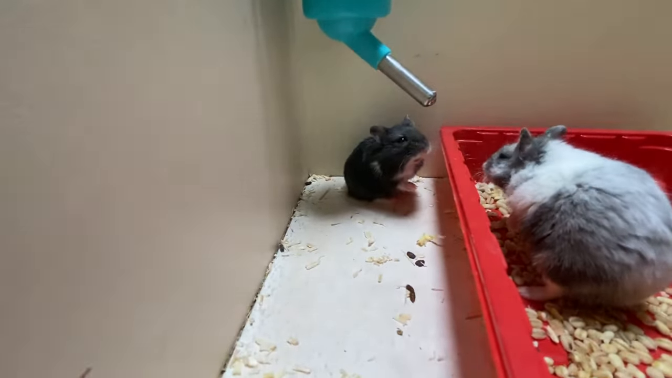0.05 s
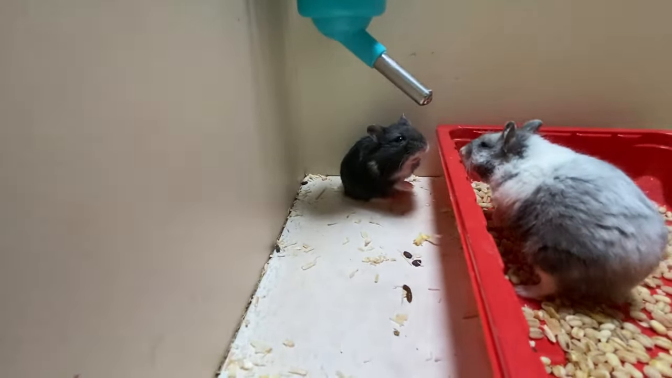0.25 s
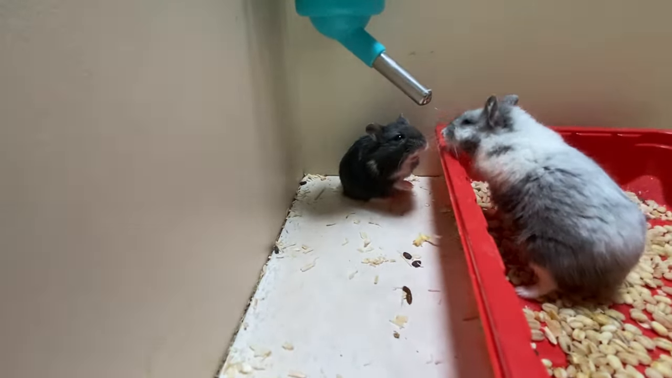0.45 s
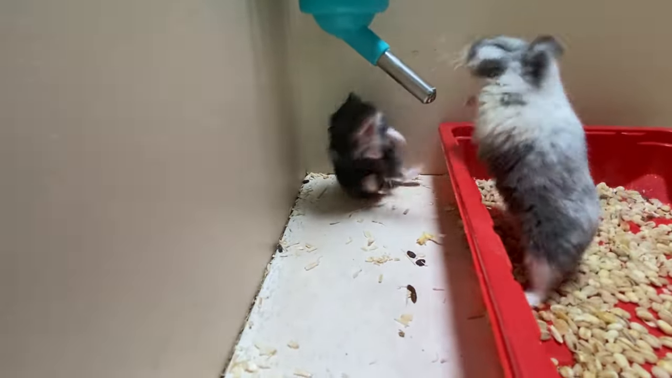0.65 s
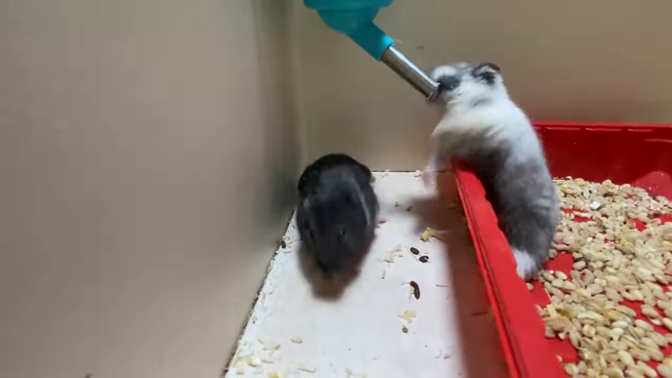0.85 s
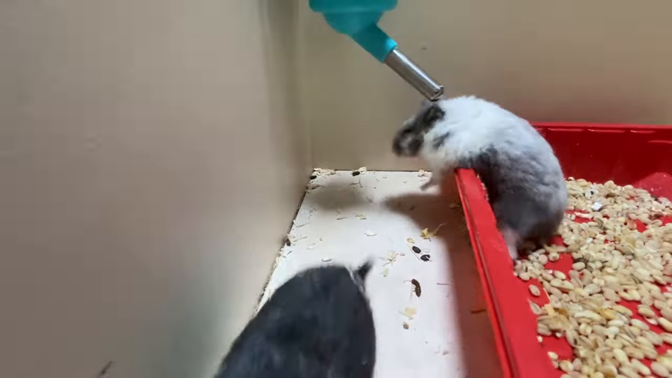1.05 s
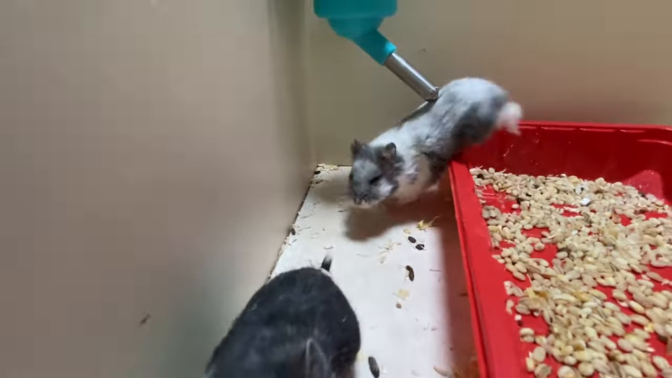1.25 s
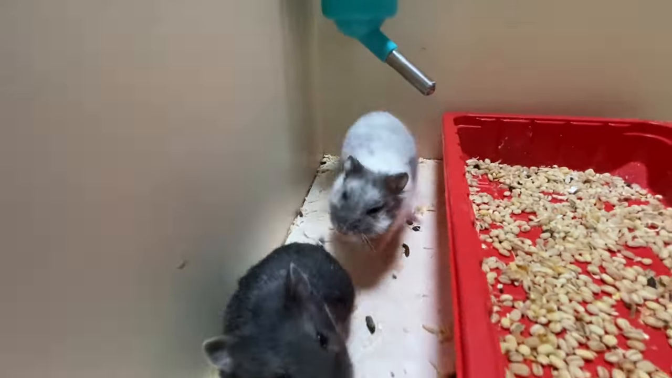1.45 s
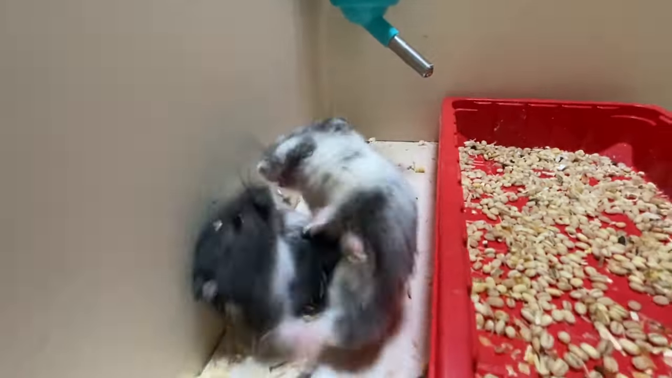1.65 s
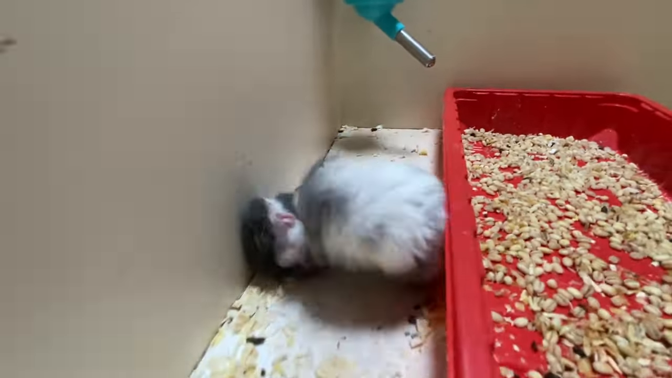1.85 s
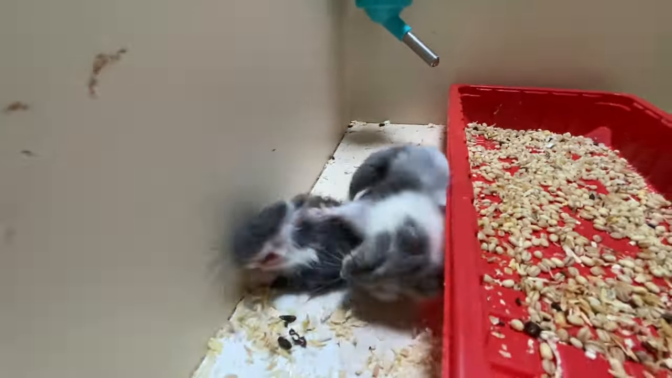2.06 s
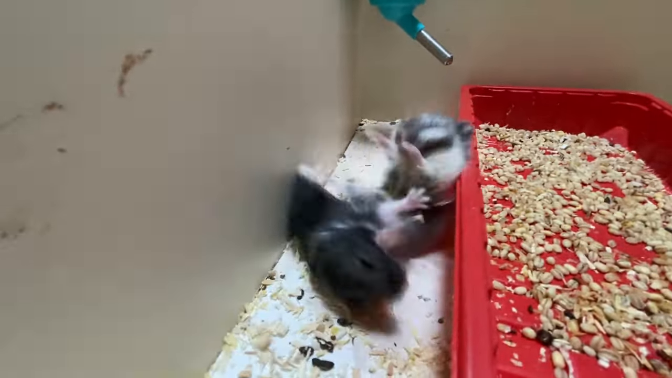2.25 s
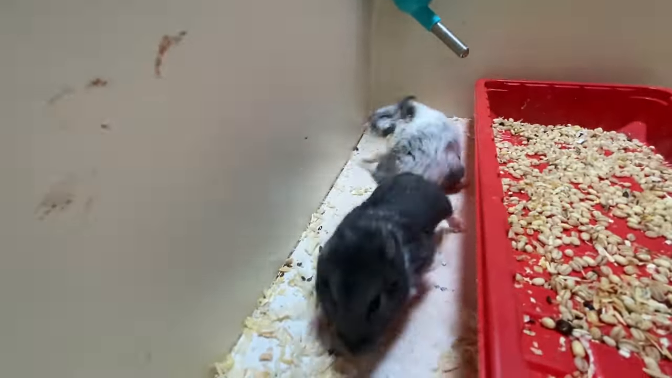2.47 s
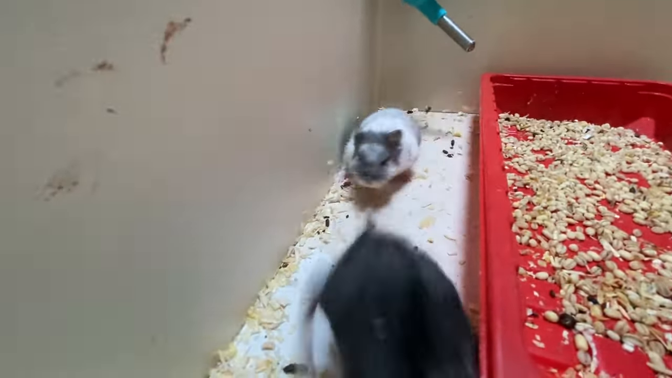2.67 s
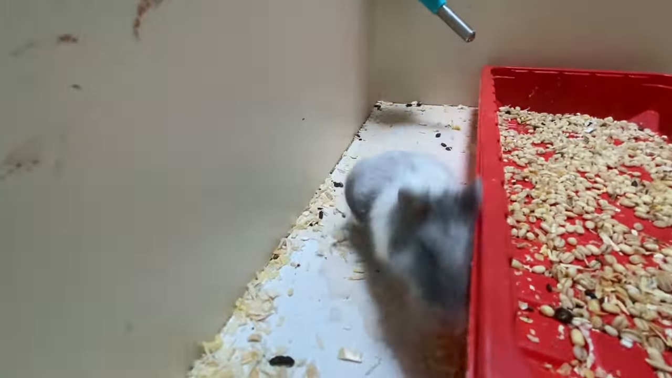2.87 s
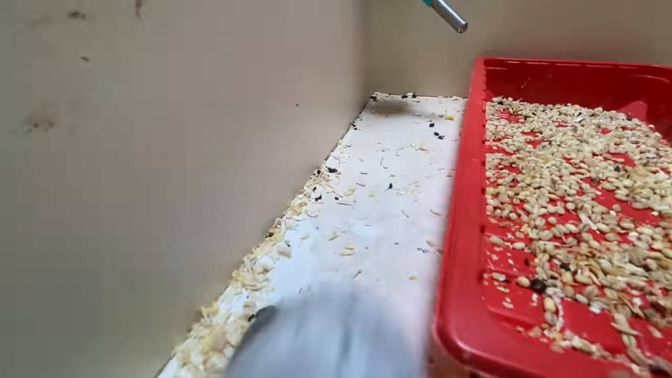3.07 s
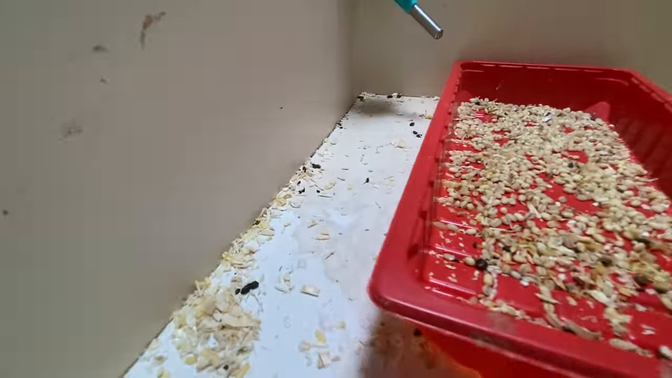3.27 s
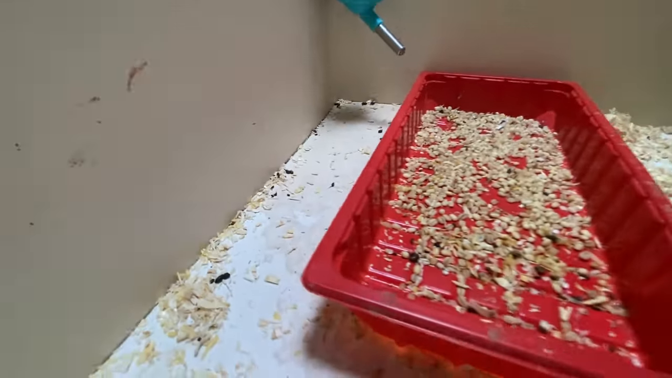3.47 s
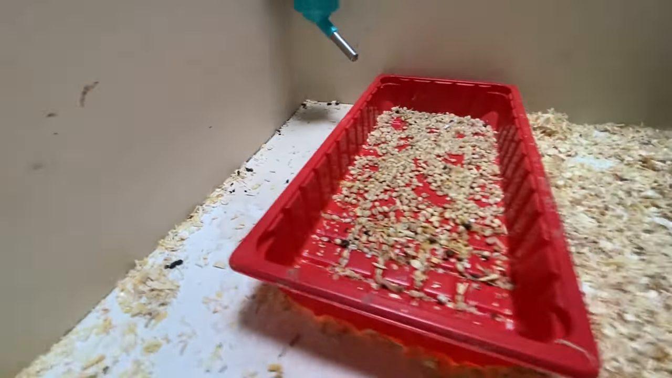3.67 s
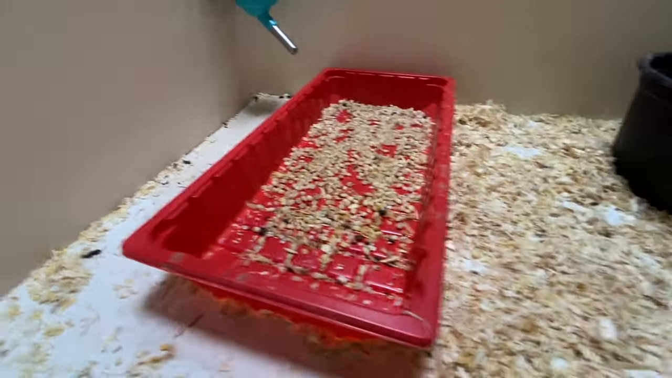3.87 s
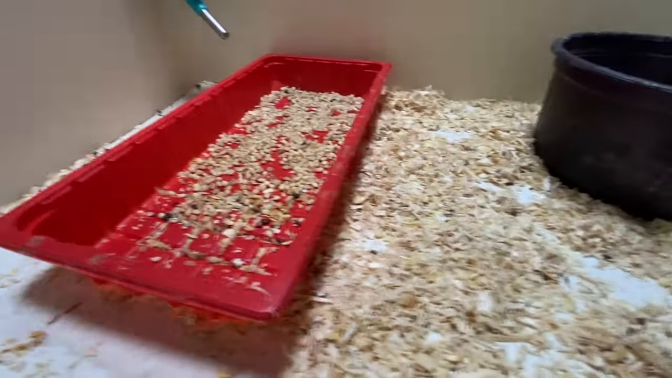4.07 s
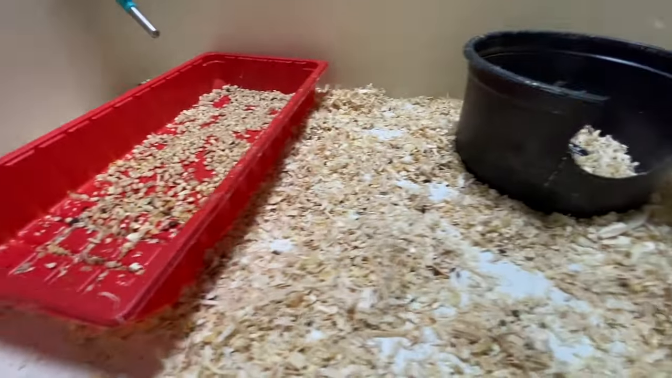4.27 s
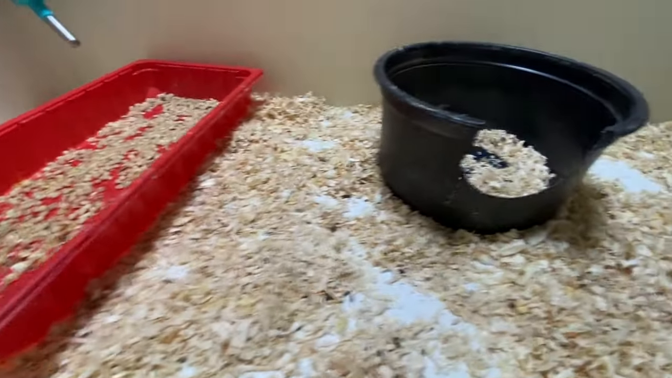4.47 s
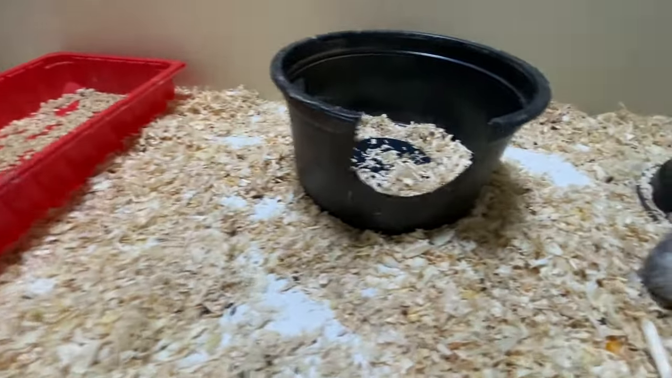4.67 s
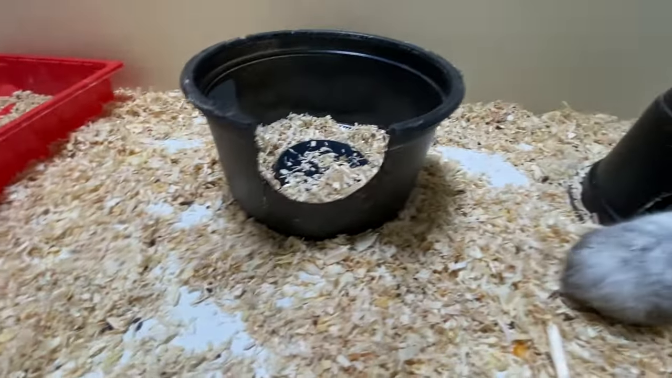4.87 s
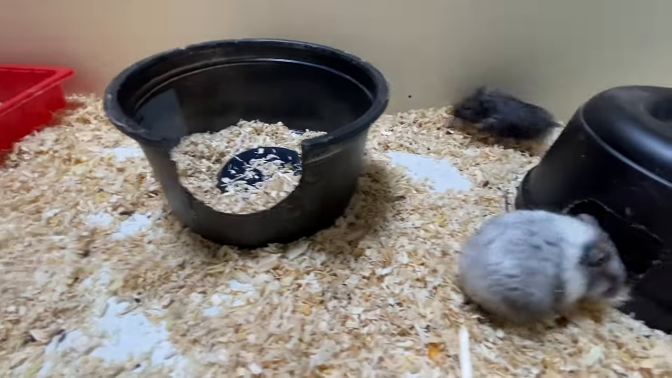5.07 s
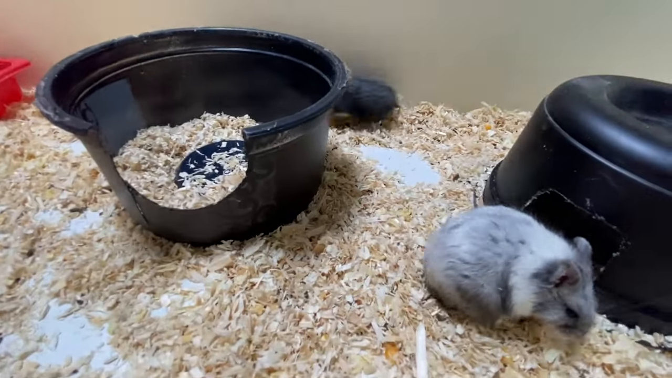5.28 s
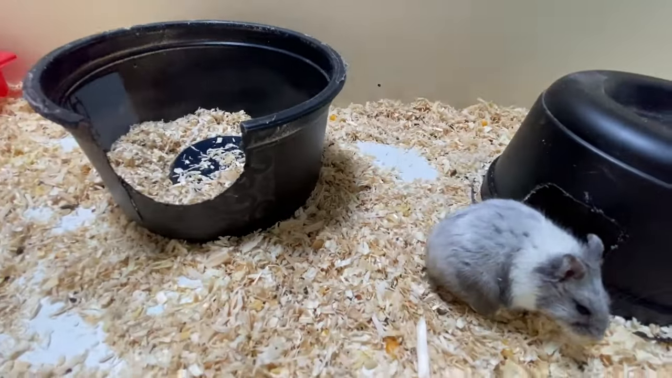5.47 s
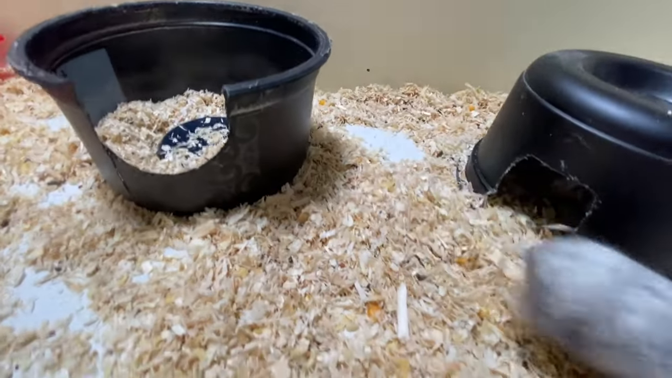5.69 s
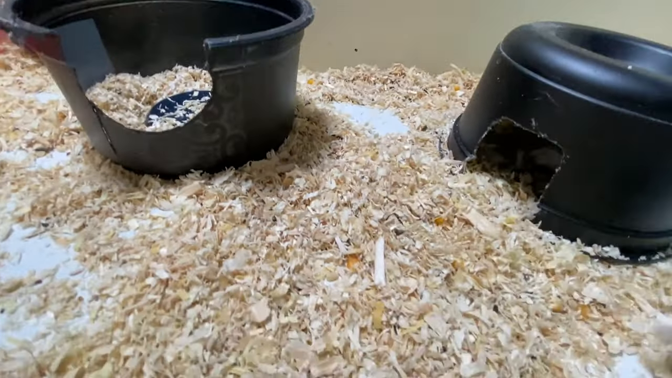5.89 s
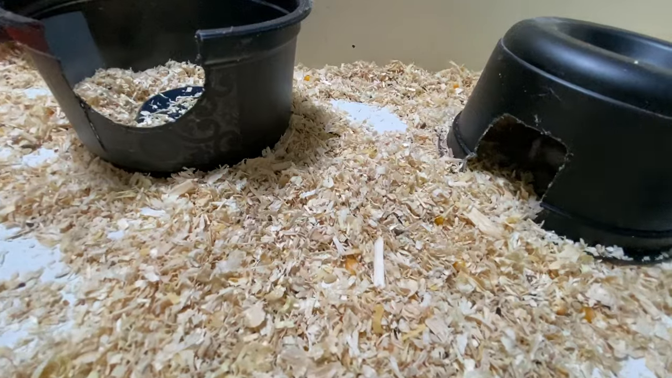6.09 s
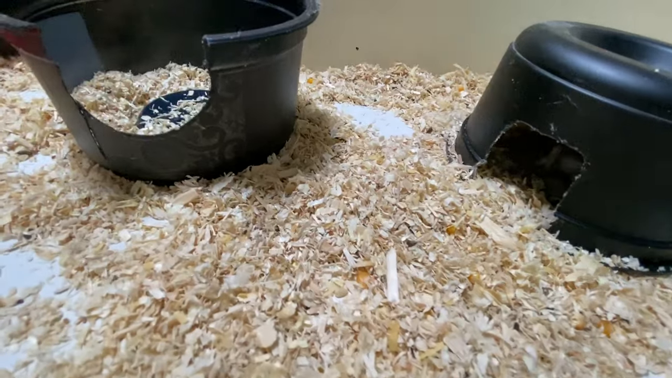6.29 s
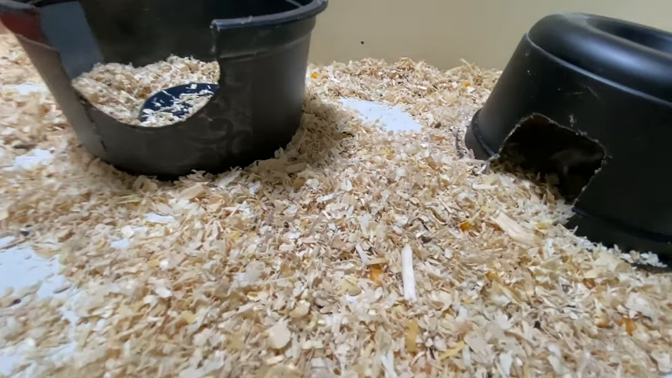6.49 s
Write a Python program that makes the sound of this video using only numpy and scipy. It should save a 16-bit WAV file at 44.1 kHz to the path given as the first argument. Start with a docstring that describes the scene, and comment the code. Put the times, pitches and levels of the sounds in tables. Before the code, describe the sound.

A faint low room hum and slight scrabbling open the sound, heard close up in a small enclosure. From about 0.6 seconds, a hamster's claws knock sharply on a plastic seed tray, building to a loud hollow scrape and rustle around 0.9 seconds, with one short raspy screech. Lighter scratching and bumps follow. From 1.6 to 2.6 seconds, two hamsters scuffle: six brief, high, hissing screeches with a fluttering squeal inside come in quick succession, among knocks and rustling. A sharp click, a thump and a low scrape follow between 2.6 and 2.9 seconds. After that it is much quieter, with paws pattering, wood shavings crackling and scattered light taps. A slightly stronger rustle and soft scrape on plastic come at about 4.1 seconds. Faint stirring continues over the hum, with small ticks near 4.8, 5.8 and 6.5 seconds.

```python
"""Faint scrabbling over a low room hum, then knocks and raspy screeches: two hamsters scuffle in a
smooth-walled box beside a plastic tray of seeds. One screeches in bursts, its fluttering vocal folds
driving the resonances of throat and mouth. Claws and bodies strike and scrape the tray, exciting its
modes, and the bedding rustles on after the cries end. A phone close by hears it through two ports."""
import sys
import numpy as np
from scipy import signal
from scipy.fft import rfft, irfft, next_fast_len
from scipy.io import wavfile
from scipy.ndimage import uniform_filter1d

SR = 44100
rng = np.random.default_rng(int(sys.argv[2]) if len(sys.argv) > 2 else 0)


def master_out(mix):
    """Clip the mix to full scale and print it as 16-bit PCM to the path in sys.argv[1]."""
    frames = np.transpose(np.atleast_2d(mix))
    ceiling = np.clip(frames, -1, 1)
    pcm = np.round(ceiling * 32767).astype(np.int16)
    wavfile.write(sys.argv[1], SR, pcm)


N = 288369

# Normal modes of the plastic tray: frequency_hz, weight_db, t60_s
TRAY_MODES = [(153, -5.5, 0.27), (272.7, -1, 0.089), (454, 8.5, 0.057), (617.4, -4, 0.07), (923, 3, 0.053),
              (1306, 6.5, 0.042), (1708, 3.5, 0.029), (2300, -24, 0.016), (2810, -2.5, 0.019),
              (3460, -13.5, 0.073)]


def screech(start_s, length_s, release_s, effort_db, squeal_db, sag_s, sag_db,
            throat_start_hz, throat_end_hz, pitch_start_hz, pitch_end_hz, rasp_db, roughness,
            trill_hz, trill_depth, squeal_width_hz, low_mouth_hz, high_mouth_hz):
    """Source and filter: fluttering vocal folds modulate pitch and airflow; the tract adds formants."""
    t = np.arange(0, length_s, 1 / SR)
    draws, cut = SR // 4, slice(len(t))
    release = np.clip((t - length_s) / release_s + 1, 0, 1)
    sag = np.exp(-((start_s + t - sag_s) / 0.017) ** 2)  # the breath sags once
    effort_db = effort_db + sag_db * sag - 21.5 * release ** 0.74
    squeal_db = squeal_db - 20.5 * release ** 3.5  # the squeal outlasts the hiss
    opening = 1 - .15 * np.exp(-t / .015)  # pitch and formants rise as the mouth opens
    pitch_hz = np.linspace(pitch_start_hz, pitch_end_hz, len(t)) * opening
    throat_hz = np.linspace(throat_start_hz, throat_end_hz, len(t))
    roughness = np.clip(roughness, 0, 1)
    flutter_hz = trill_hz * (1 + 0.071 * wander(draws, span=470)[cut])
    trill = 2 * np.pi * (np.cumsum(flutter_hz) / SR + rng.random())
    jitter = .15 * roughness * wander(draws, span=25)[cut]
    cycles = np.cumsum(pitch_hz * (1 + .11 * np.sin(trill) + jitter)) / SR
    folds = sum(np.cos(2 * np.pi * k * cycles) for k in range(1, 9))
    air = (1.3 + np.exp(-(cycles % 1) / 0.43)) * rng.standard_normal(draws)[cut]  # one pulse a cycle
    puffs = np.exp(trill_depth * np.cos(trill - 1.2))
    drive = ((1 - roughness) * unit_rms(folds) + roughness * unit_rms(air)) * puffs
    chest = resonate_twice(drive, 1100, 600)
    squeal = unit_rms(resonate_twice(drive, pitch_hz, squeal_width_hz)) + .65 * unit_rms(chest)
    jaw = opening + .03 * wander(draws, span=1470)[cut]
    formants = [(1.55 * pitch_hz, 300), (low_mouth_hz, 450), (high_mouth_hz, 600)]
    rasp = sum(resonate_twice(drive, hz * jaw, width_hz) for hz, width_hz in formants)
    throat = resonate_twice(drive, throat_hz * jaw, 2000) - 0.39 * resonate(drive, 13450, 3800)
    hiss = unit_rms(throat) + amp(rasp_db) * unit_rms(rasp)
    cry = amp(effort_db) * hiss + amp(squeal_db) * unit_rms(squeal)
    return start_s, cry * signal.windows.tukey(len(t), .02)


def knock(start_s, level_db, snap_hz, thud_db, crack_db):
    """Impact excitation: a blow snaps, cracks in the treble and leaves the tray's modes in free decay."""
    t = np.arange(5000) / SR
    mode_hz, mode_db, t60 = np.transpose(TRAY_MODES)[:, :, None]
    coupling_db = np.where(mode_hz < 700, thud_db + 6, -9 * abs(np.log2(mode_hz / snap_hz)))
    strength = amp(mode_db + coupling_db) * rng.uniform(.3, 1.2, mode_hz.shape)  # each lands elsewhere
    build_up = 1 - np.exp(-t * mode_hz ** 2 / 1100)  # low modes swell later
    detuned_hz = mode_hz * rng.uniform(0.94, 1.03, mode_hz.shape)
    ring = (strength * build_up * amp(-60 * t / t60) * np.sin(2 * np.pi * detuned_hz * t)).sum(0)
    snap = amp(-60 * t * snap_hz / 7) * np.sin(2 * np.pi * snap_hz * t)  # dies in seven cycles
    burst = rng.standard_normal(len(t)) * (amp(-60 * t / 0.015) + 0.061 * amp(-60 * t / 0.19))
    crack = amp(crack_db) * resonate_twice(burst, 6700, 7400)
    crack += 0.39 * resonate_twice(burst, 1.98 * snap_hz, 1700)
    return start_s, amp(level_db + 6) * (0.33 * ring + 1.76 * snap + 0.76 * crack)


def scrape(peak_s, rise_s, fall_s, level_db, ring_hz, width_hz):
    """Forced vibration: uneven friction drives one mode of the hollow plastic."""
    t = np.arange(peak_s - rise_s, peak_s + fall_s, 1 / SR)
    slips = rng.standard_normal(2 * SR) * amp(2 * wander(2 * SR, span=2000))
    hollow = unit_rms(resonate_twice(slips[:len(t)], ring_hz, width_hz))
    envelope = amp(level_db + swell_db(t, peak_s, rise_s, fall_s, edge_db=-28))
    return t[0], envelope * hollow * signal.windows.tukey(len(t), .05)


def paws():
    """Shot noise: chips and seeds tick in clumps over a wash; footfalls drive the tray's low modes."""
    # Spectra of the bedding's rustle and its treble fizz: frequency_hz, density_db
    rustle_spectrum = [(600, -15.5), (1000, 3), (1700, 3), (3000, -4.5), (5000, -7), (7000, -17),
                       (10000, -41.5)]
    fizz_spectrum = [(4500, -11.5), (7000, 0.5), (9000, -3.5), (12000, -3), (16500, -19)]
    rustle_gain, boom_gain, fizz_gain, crackle = bedding_levels()
    clumps = amp(1.4 * wander(N, span=410))
    tick_sizes = amp(6.4 * np.minimum(rng.exponential(1, N), 2.8))
    ticks = tick_sizes * (rng.random(N) < 300 * clumps / SR)  # about 300 a second
    decay = amp(-60 * np.arange(900) / SR / 0.018)
    chips = unit_rms(np.sqrt(abs(signal.oaconvolve(ticks ** 2, decay ** 2)[:N])))
    grain = patchy(rng.standard_normal((2, N)) * (1 + crackle * chips) * clumps ** crackle)
    steps = rng.standard_normal((2, N)) * amp(2.5 * wander(N, span=324))
    boom = sum(amp(db) * resonate_twice(steps, hz, 2.94 / t60) for hz, db, t60 in TRAY_MODES[1:5])
    boom += 1.07 * resonate_twice(steps, 406, 600)
    ring = sum(amp(db) * resonate(grain, hz, 2.8 / t60) for hz, db, t60 in TRAY_MODES[4:])
    rustle = coloured(grain, rustle_spectrum) + .5 * unit_rms(ring)
    fizz = coloured(grain, fizz_spectrum)
    return rustle_gain * unit_rms(rustle) + fizz_gain * fizz + boom_gain * unit_rms(boom)


def bedding_levels(hold_samples=32):
    """Incoherent sources add in power: gains for stirring plus scrabbles, and the depth of crackle."""
    # Steady stirring of the bedding: time_s, rustle_db, boom_db, fizz_db
    stirring = [(0, -76, -64, -77.5), (.55, -90, -68.5, -107), (.66, -49, -58, -55), (.8, -28.5, -54, -57),
                (1.0, -44.5, -59, -88), (1.4, -69, -61.5, -68.5), (1.62, -52, -47.5, -52),
                (2.2, -47.5, -51, -52), (2.62, -56, -42, -57.5), (2.85, -56, -41.5, -53),
                (3.18, -61, -54.5, -60), (3.75, -65.5, -56.5, -65.5), (4.14, -44.5, -50.5, -52.5),
                (4.45, -54, -53, -61), (5.12, -53.5, -56, -56.5), (5.4, -61.5, -59.5, -65.5),
                (6.0, -69.5, -60.5, -77), (6.54, -64.5, -58, -62)]
    # Single scrabbles of paws: peak_s, rise_s, fall_s, rustle_db, fizz_re_rustle_db
    scrabbles = [(.239, 0.025, 0.066, -54.5, -36), (.444, 0.091, 0.15, -55, -14.5),
                 (0.633, 0.019, 0.3, -38, -31), (.96, 0.18, 0.11, -25, -32), (1.149, 0.12, 0.2, -37, -12.5),
                 (1.303, 0.11, 0.043, -36, -52), (2.637, 0.11, 0.1, -39.5, -7.5),
                 (3.081, 0.066, 0.045, -43, -3.5), (3.298, 0.08, 0.11, -50, -2.5),
                 (3.613, 0.62, 0.16, -56.5, 5), (3.921, 0.093, 0.59, -57, 3.5), (4.03, 0.022, .08, -50, 0),
                 (5.682, 0.052, 0.27, -53, -2), (5.85, 0.075, 0.072, -52, -11),
                 (6.088, 0.17, 0.45, -60, -11), (6.494, 0.018, .12, -45, -7)]
    t = np.arange(0, N, hold_samples) / SR
    rustle, boom, fizz = amp(over_time(stirring, t))
    calm = rustle
    for peak_s, rise_s, fall_s, rustle_db, fizz_re_rustle_db in scrabbles:
        burst = amp(rustle_db + swell_db(t, peak_s, rise_s, fall_s, edge_db=-23))
        rustle = np.hypot(rustle, burst)
        fizz = np.hypot(fizz, amp(fizz_re_rustle_db) * burst)
    crackle = .35 + .3 * (1 - (calm / rustle) ** 2)  # scrabbles tick more sharply
    return np.repeat([rustle, boom, fizz, crackle], hold_samples, axis=1)[:, :N]


def wall_echoes(x):
    """All-pass scattering: repeated reflections shift the phase but keep the magnitude spectrum."""
    # Echoes between the walls: delay_ms, reflection_ratio
    echoes = [(1.103, 0.15), (2.301, 0.67), (4.702, 0.29)]
    size = next_fast_len(N + SR)
    hz, spectrum = np.fft.rfftfreq(size, 1 / SR), rfft(x, size)
    for delay_ms, reflection in echoes:
        delay = np.exp(-2j * np.pi * hz * delay_ms / 1000)
        spectrum = spectrum * (delay - reflection) / (1 - reflection * delay)
    return irfft(spectrum, size)[:N]


def box_tail(x, t60_s=0.019):
    """Reverberation: sparse reflections of random sign decay exponentially in the box."""
    slots = np.arange(100, 6000, 20)
    reflections = rng.choice([-1., 1.], len(slots)) * amp(-60 * slots / SR / t60_s)
    taps = np.zeros(6020)
    taps[slots + rng.integers(0, 20, len(slots))] = reflections
    return signal.oaconvolve(x, taps / np.linalg.norm(taps))[:N]


def room():
    """Narrow-band noise: a wavering rumble and a fuzzy hum, as of distant machines."""
    # Background levels: time_s, rumble_db, hum_db
    levels = [(0, -50.5, -57), (.48, -57, -57), (.84, -41, -41), (1.07, -49, -56.5), (1.3, -48, -45.5),
              (1.67, -49, -46), (1.85, -56.5, -59.5), (2.18, -47, -52.5), (2.46, -59, -54),
              (3.35, -47, -56), (3.6, -53.5, -60.5), (3.77, -51.5, -48), (4.37, -49, -47),
              (4.61, -50.5, -55.5), (4.87, -46, -59), (5.29, -58, -57.5), (6.54, -45, -58)]
    # Spectrum of the rumble: frequency_hz, density_db
    rumble_spectrum = [(25, -22.5), (42, -3), (55, 19), (70, 0.5), (115, 6.5), (140, -58.5)]
    # Resonances of the hum: centre_hz, width_hz, weight_db
    hum_bands = [(146.4, 27, 7.5), (194, 120, -7)]
    rumble_db, hum_db = over_time(levels, np.arange(N) / SR)
    noise = rng.standard_normal((2, N))
    hum = sum(amp(db) * resonate_twice(noise, hz, width_hz) for hz, width_hz, db in hum_bands)
    return amp(rumble_db) * coloured(noise, rumble_spectrum) + amp(hum_db) * unit_rms(hum)


def resonate(x, hz, width_hz):
    """Heterodyne resonance of gain 1: shift hz (which may glide) to zero, smooth, shift back."""
    carrier = np.exp(2j * np.pi * np.cumsum(hz * np.ones(x.shape[-1])) / SR)
    pole = np.exp(-np.pi * width_hz / SR)
    return 2 * (carrier * signal.lfilter([1 - pole], [1, -pole], x / carrier + 1e-18)).real


def resonate_twice(x, hz, width_hz):
    """Two resonances in cascade give steeper skirts."""
    return resonate(resonate(x, hz, width_hz), hz, width_hz)


def coloured(x, spectrum):
    """Spectral shaping, scaled to rms 1."""
    size = next_fast_len(N)
    gain = amp(over_frequency(spectrum, np.fft.rfftfreq(size, 1 / SR))[0])
    return unit_rms(irfft(rfft(x, size) * gain, size)[..., :N])


def patchy(x, depth_db=3):
    """Random amplitude modulation in patches of some 30 ms by 1 kHz."""
    spectra = signal.stft(x, nperseg=256)[2]
    patches = uniform_filter1d(rng.standard_normal(spectra.shape[1:]), size=7, axis=0)
    patches = uniform_filter1d(patches, size=9, axis=1)
    return signal.istft(spectra * amp(depth_db * unit_rms(patches)), nperseg=256)[1][:, :N]


def wander(count, span):
    """Low-pass noise of rms 1, smoothed twice over span samples."""
    return unit_rms(uniform_filter1d(uniform_filter1d(rng.standard_normal(count), span), span))


def swell_db(t, peak_s, rise_s, fall_s, edge_db):
    """Exponential growth and decay: from edge_db to 0 dB at peak_s and down again."""
    return edge_db * np.maximum((peak_s - t) / rise_s, (t - peak_s) / fall_s)


def over_frequency(rows, hz):
    """Interpolates each column on a logarithmic frequency axis."""
    row_hz, *columns = np.transpose(rows)
    return [np.interp(np.log(hz + 1), np.log(row_hz + 1), column) for column in columns]


def over_time(rows, t):
    """Interpolates each column linearly in time."""
    row_s, *columns = np.transpose(rows)
    return [np.interp(t, row_s, column) for column in columns]


def amp(db):
    """Decibels to amplitude ratio."""
    return 10 ** (np.asarray(db) / 20)


def unit_rms(x):
    """Normalises to unit mean power."""
    return x / np.sqrt(np.mean(x ** 2) + 1e-20)


def add(mix, start_s, sound):
    """Superposes a sound on the mix."""
    part = mix[round(start_s * SR):][:len(sound)]
    part += sound[:len(part)]


def scene():
    """Superposition of all sources on two paths: channel 0 direct, channel 1 scattered."""
    # Cries: start_s, length_s, release_s, effort_db, squeal_db, sag_s, sag_db, throat_start_hz,
    # throat_end_hz, pitch_start_hz, pitch_end_hz, rasp_re_effort_db, roughness_ratio, trill_hz,
    # trill_depth, squeal_width_hz, low_mouth_hz, high_mouth_hz (pitch and formants for an open mouth)
    screeches = [(0.822, 0.15, 0.068, -22.5, -29, .853, -2.5, 11200, 7660, 1712, 1648, -7, 0.71, 159, 0.27, 500, 3600, 6400),
                 (1.628, 0.12, 0.019, -21, -30.5, 1.638, -9.5, 10600, 11000, 1193, 1296, -15.5, 0.85, 124, 0.93, 905, 3700, 5500),
                 (1.804, 0.14, 0.027, -24.5, -30.5, 1.891, -4.5, 9050, 11000, 1495, 1650, -8.5, 0.63, 110.7, 0.24, 900, 3330, 6100),
                 (2.017, 0.096, 0.019, -23.5, -33, 2.078, -2, 11940, 10600, 1808, 1613, -12.5, 0.61, 99, 0.23, 446, 3700, 4700),
                 (2.113, 0.061, 0.032, -22, -31, 2.114, -10, 9700, 10600, 1810, 1580, -10, 0.71, 173, 0.096, 446, 2880, 5000),
                 (2.225, 0.1, 0.035, -25, -31.5, 2.261, -6.5, 10800, 8700, 2042, 1593, -10.5, 0.48, 119.1, 0.15, 495, 3690, 6450),
                 (2.389, 0.18, 0.027, -24.5, -30, 2.405, -4, 8800, 7300, 1772, 1595, -8, 0.64, 109, 0.1, 388, 3480, 6340)]
    # Blows on tray and wall: start_s, relative_level_db, snap_hz, thud_weight_db, crack_weight_db
    knocks = [(0.609, -31.5, 2030, -39, -12.5), (0.638, -43.5, 1750, -23, -0.5),
              (0.707, -36.5, 870, -30, -7), (0.73, -37.5, 930, -25, 12.5), (0.759, -13, 2300, -40, -5.5),
              (0.813, -10.5, 890, -13, -19.5), (0.942, -14, 4240, -23, -32), (1.116, -32.5, 2600, -24, -27),
              (1.144, -39, 920, -32, -3), (1.279, -30, 1900, -14, -16), (1.534, -30.5, 1050, -15, -19),
              (1.566, -45, 4000, -18, 8.5), (1.602, -37.5, 990, -19, 0), (1.607, -33, 297, -25, -27),
              (1.654, -34, 1980, -12, 7), (1.676, -25, 430, -4.5, -0.5), (1.766, -36, 1470, -27, -20),
              (1.945, -24.5, 1370, -12, -15.5), (1.983, -33.5, 476, -8, -25),
              (2.263, -27.5, 2230, -34, 2.5), (2.359, -44, 3000, -20, -4), (2.425, -34.5, 595, -2, -25),
              (2.475, -36, 550, -14, -25), (2.618, -16.5, 2410, -50, -21), (2.708, -43.5, 1150, 9, -16),
              (2.739, -20.5, 1240, -6, -34), (2.836, -34, 1240, 0, -36), (2.838, -34, 387, 1.5, -30),
              (2.984, -45.5, 696, 0, 3), (3.088, -44, 1270, 6.5, -21), (3.227, -40, 1560, -25, -10),
              (3.279, -40, 780, -2.5, -10), (3.357, -46.5, 804, -11, 1.5), (3.42, -54.5, 3000, -21, 10.5),
              (3.756, -42, 930, 3.5, -10), (3.891, -45, 3900, -28, 12.5), (4.02, -43.5, 780, -22, 6),
              (4.127, -33, 665, -3, -35), (4.478, -45, 4930, -20, 2), (4.788, -35, 1850, -20, -5),
              (4.844, -53, 970, 5, 14), (5.847, -37, 1970, -15, -22), (6.491, -44.5, 1700, -3, -1)]
    # Drags along hollow plastic: peak_s, rise_s, fall_s, level_db, ring_hz, width_hz
    scrapes = [(0.721, 0.026, 0.061, -33, 897, 121), (.83, .032, .062, -27.5, 586, 120),
               (.895, .07, 0.023, -19.5, 1696, 70), (0.899, 0.11, 0.13, -28.5, 444.5, 45.7),
               (.93, 0.19, .1, -22.5, 898, 150), (1.2, 0.15, 0.39, -43.5, 910, 120),
               (1.295, .04, 0.081, -32.5, 245, 149), (2.72, 0.16, 0.14, -34.5, 278, 80),
               (4.13, 0.045, 0.49, -40, 626, 114), (5.12, 0.26, 0.26, -50.5, 330, 39.7),
               (5.19, 1.4, 0.14, -56, 610, 55)]
    direct = np.zeros(N)
    for source, events in [(screech, screeches), (knock, knocks), (scrape, scrapes)]:
        for event in events:
            add(direct, *source(*event))
    tail = amp(-6) * box_tail(direct)
    return np.array([direct + tail, wall_echoes(direct) + tail]) + paws() + room()


def record(dry):
    """Partial coherence: the left port hears the direct path, the right a phase-shifted blend of both."""
    # The two microphone ports: frequency_hz, coherence_ratio, right_lead_turns, left_over_right_db
    ports = [(60, .68, 0, 0), (280, .55, -.1, 2.5), (385, .7, -.42, 4), (620, .5, -.34, 2.5),
             (1000, .85, -.5, 1.5), (1500, .65, -.55, 2), (2300, .3, -.7, 4), (3000, .2, -.8, 1),
             (6000, .35, -1.03, 5), (7200, .35, -1.5, 2), (8600, .2, -1.9, -1), (9300, .6, -2.2, -3),
             (10000, .9, -2, 0), (11200, .8, -1.72, 0), (11800, .995, -1.5, 0), (12300, .995, -1.5, 0),
             (12900, .7, -1.28, 0), (13400, .98, -1, 0), (14400, .98, -1, 0), (15300, .85, -.5, 0)]
    size = next_fast_len(N + SR)
    coherence, lead_turns, balance_db = over_frequency(ports, np.fft.rfftfreq(size, 1 / SR))
    coherence = np.clip(coherence, 0, 1)
    direct, scattered = rfft(dry, size)
    right = coherence * np.exp(2j * np.pi * lead_turns) * direct + np.sqrt(1 - coherence ** 2) * scattered
    balance = amp(balance_db / 2)
    pair = irfft(np.array([direct * balance, right / balance]), size)[:, :N]
    pair = signal.lfilter(*signal.butter(2, 36, "high", fs=SR), pair)  # the capsules lose deep bass
    band_limit = signal.firwin(511, 16050, window=("kaiser", 9), fs=SR)
    return signal.oaconvolve(pair, band_limit[None], "same")


dry = scene()
out = record(dry)
master_out(out)
```